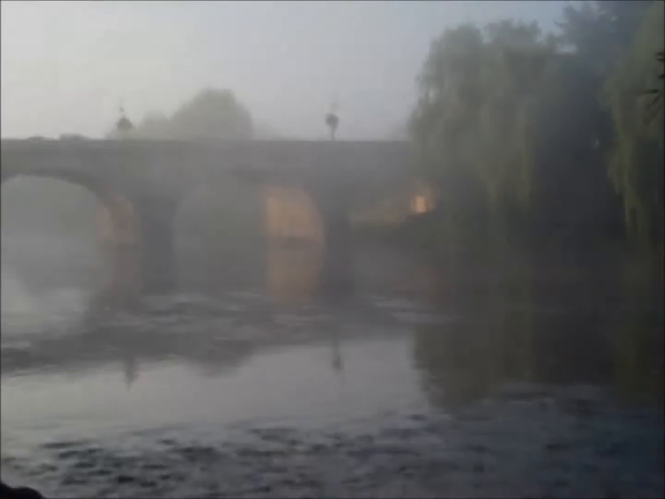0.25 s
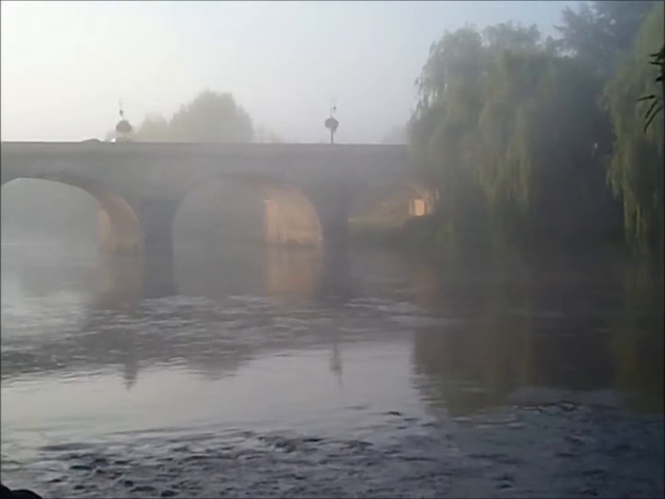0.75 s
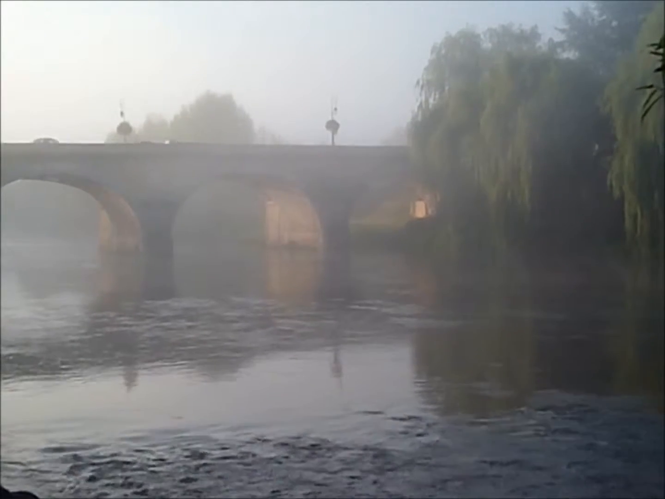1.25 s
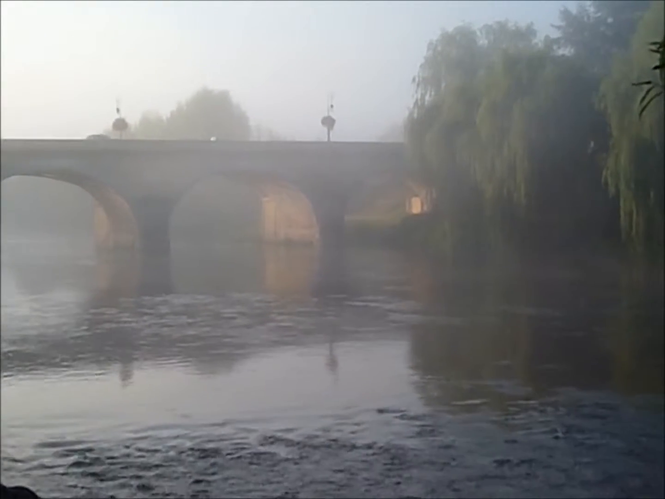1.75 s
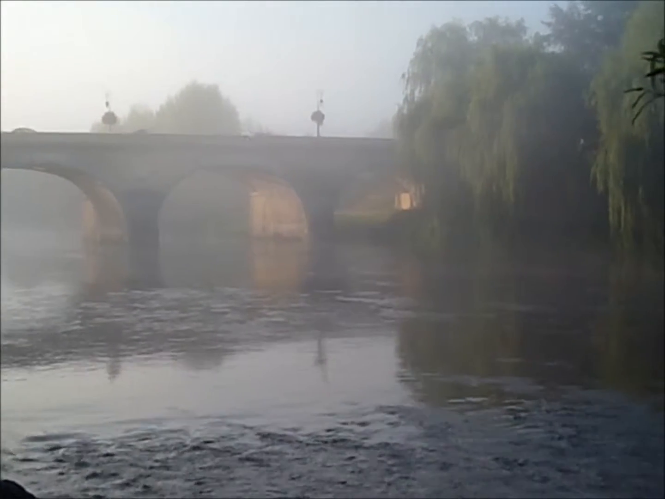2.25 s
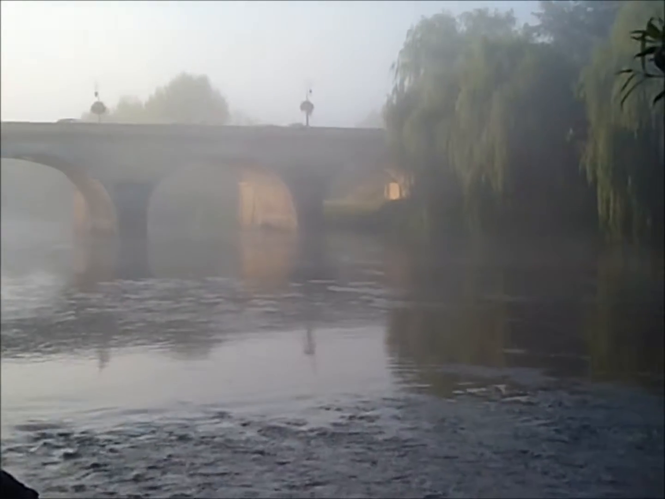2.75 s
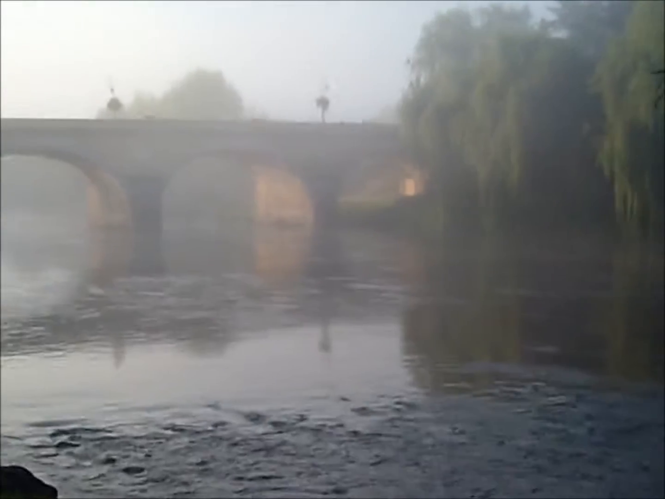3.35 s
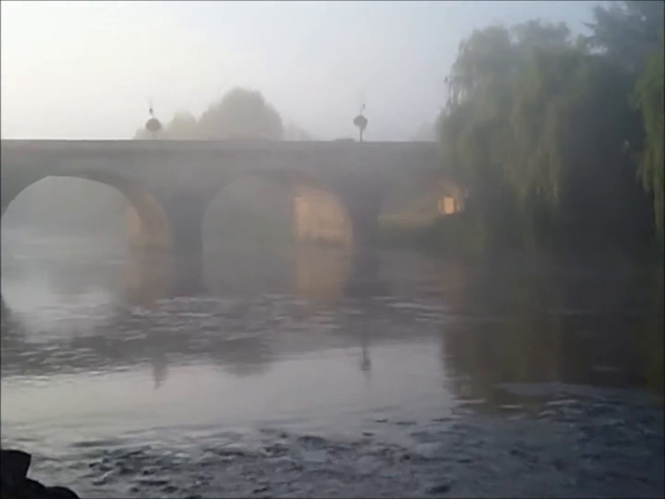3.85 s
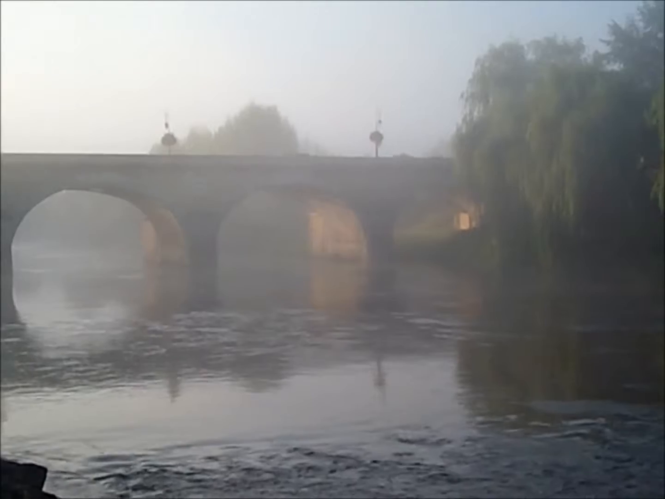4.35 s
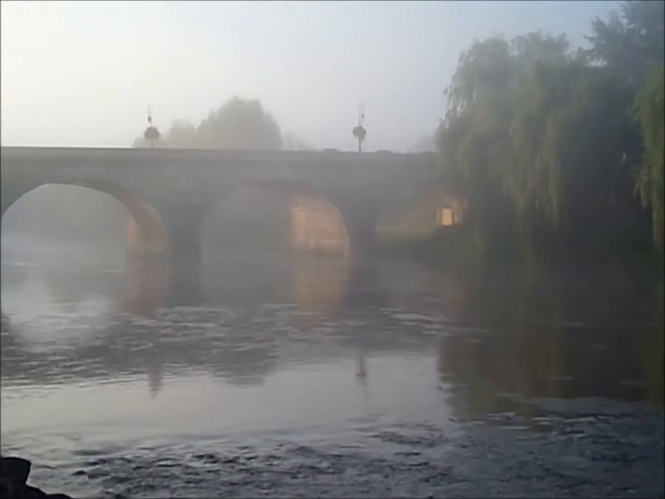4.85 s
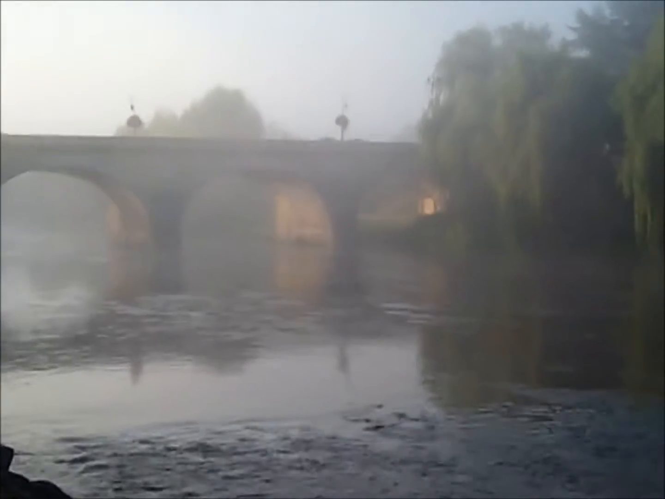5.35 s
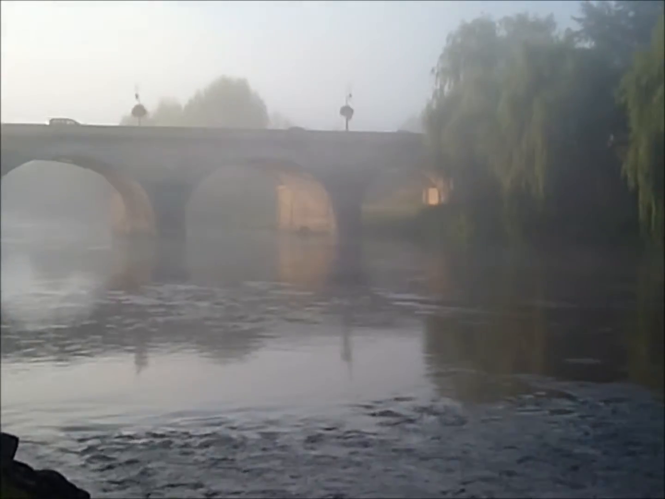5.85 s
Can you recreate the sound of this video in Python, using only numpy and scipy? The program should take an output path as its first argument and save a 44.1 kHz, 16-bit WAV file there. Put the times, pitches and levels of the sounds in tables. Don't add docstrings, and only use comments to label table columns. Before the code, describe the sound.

A soft, continuous rush of riffle water with tiny bubbling details, a slight change of tone midway, and a long fade towards quiet.

```python
import sys
import numpy as np
from scipy import signal
from scipy.io import wavfile
from scipy.ndimage import uniform_filter1d

SR = 44100
rng = np.random.default_rng(int(sys.argv[2]) if len(sys.argv) > 2 else 0)


def inscribe(sig):
    pcm = np.round(np.clip(np.atleast_2d(sig).T, -1, 1) * 32767)
    wavfile.write(sys.argv[1], SR, pcm.astype(np.int16))


def voltage_ratio(level):
    return 10 ** (np.asarray(level, float) / 20)


N = 269010

FLOW_HZ = (300, 950, 1600, 2300)


def evened(x):
    return x / np.sqrt(np.mean(x ** 2) + 1e-20)


def read(points, hz):
    f, value = np.transpose(points)
    return np.interp(np.log(hz + 1), np.log(f + 1), value)


def add(mix, s, sound):
    part = mix[:, round(s * SR):][:, :sound.shape[1]]
    part += sound[:, :part.shape[1]]


def fader_db(t):
    open_db = -48.5
    start_gain, opening_s = 0.74, 1
    fall_s, silent_s = 1.99, 7.335
    opening = start_gain + (1 - start_gain) * np.sqrt(np.clip(t / opening_s, 0, 1))
    closing = np.clip((silent_s - t) / (silent_s - fall_s), .01, 1)
    return open_db + 20 * np.log10(opening * closing)


def classes_db(t):
    facing_db = (-1.5, -1.4, -1.3)
    turned_db = (-0.55, .5, 0.17)
    # (time [s], half length [s], class 0 wash 1 roar 2 burble 3 rush, level [dB])
    swells = [(1.4, .12, 2.5, 1.5), (1.8, 0.1, 1, 2), (2.0, 0.11, 2, -1.5), (2.852, .2, 3, 1),
              (3.1, .2, 1.5, 2), (3.4, .1, 1.5, -1.2), (3.6, 0.12, 2, -2), (4.2, .1, 4, -.8),
              (4.95, .5, 3, 1.5), (4.9, 0.46, 0.5, 1.2), (4.7, .2, 1, 1), (5.599, 0.097, 1, 2),
              (5.598, 0.14, 0.5, -2.5), (5.8, .1, 3.5, 0.5)]
    turn_s, turn_length_s = 2.85, 0.44
    turned = .5 + .5 * np.tanh((t - turn_s) / turn_length_s)
    out = np.outer((*facing_db, 0), 1 - turned) + np.outer((*turned_db, 0), turned)
    for at, length, which, db in swells:
        chosen = np.arange(len(out)) == round(which)
        out = out + db * np.outer(chosen, np.exp(-((t - at) / length) ** 2))
    return out


def turbulence_db(t, hz, patchy_db=0.27, flicker_db=0.26, treble_follow=0.023):
    # (time [s], half length [s], frequency [Hz], half width [Hz], level [dB])
    splashes = [
        (1.838, 0.18, 4000, 378, 3),
        (2.9, 0.21, 4080, 280, 4),
        (5.798, 0.061, 3950, 250, -1),
        (1.045, 0.027, 1770, 250, 4),
        (4.55, .25, 1510, 200, 3.5),
        (5.4, 0.22, 1010, 150, 4),
    ]
    place = np.interp(np.log(hz + 1), np.log(FLOW_HZ), np.arange(len(FLOW_HZ)))
    weights = np.maximum(1 - abs(place[:, None] - np.arange(len(FLOW_HZ))), 0)
    rush_db = fader_db(t)
    octaves = np.clip(np.log2(hz / 3000 + 1e-9), 0, 2)
    spray_db = treble_follow * np.outer(octaves, rush_db - rush_db.mean())
    draws = rng.standard_normal((2, len(hz), len(t)))
    patches = uniform_filter1d(uniform_filter1d(draws[0], size=14, axis=0), size=12, axis=1)
    flicker = uniform_filter1d(uniform_filter1d(draws[1], size=90, axis=0), size=2, axis=1)
    field_db = weights @ classes_db(t) + spray_db
    field_db = field_db + patchy_db * evened(patches) + flicker_db * evened(flicker)
    for at, length, centre_hz, width, db in splashes:
        field_db = field_db + db * np.exp(-((hz[:, None] - centre_hz) / width) ** 2 - ((t - at) / length) ** 2)
    return field_db


def notch_filter(hz):
    # (frequency [Hz], half width [Hz])
    notches = [(4500, 223), (4900, 340), (5700, 360), (6090, 306)]
    return np.prod([abs(hz - f) / np.hypot(hz - f, w) for f, w in notches], axis=0)


def river(hiss_db=-103):
    # (frequency [Hz], level [dB per Hz])
    ahead_db = [(40, -115), (80, -107.5), (300, -95), (580, -89), (750, -83.5), (950, -80), (1250, -82.5),
                (1600, -80.5), (2100, -83), (4000, -81.5), (5250, -81.5), (6200, -93), (8000, -103),
                (10300, -126)]
    # (frequency [Hz], level [dB per Hz])
    around_db = [(30, -115), (250, -111), (500, -105), (950, -94.5), (1600, -93.5), (3000, -92.5),
                 (4000, -87.5), (5250, -85.5), (6200, -91), (7000, -98.5), (9000, -105), (10350, -113.5),
                 (10980, -111), (11120, -115), (11600, -119)]
    # (frequency [Hz], left over right [dB])
    ports_db = [(60, 0.5), (500, 1), (950, 2.5), (1600, 1), (4000, 2.5), (5300, 2), (6600, 6.5),
                (8000, 6.5), (11000, 3)]
    # (frequency [Hz], right lag [rad])
    ports_lag = [(200, 0.019), (800, 0), (4000, 0.33), (7000, .5), (8500, 0.041)]
    frames, hz = N // 256 + 5, np.fft.rfftfreq(1024, 1 / SR)
    t = np.arange(frames) * 256 / SR
    draws = rng.standard_normal((10, len(hz), frames))
    z = draws[:5] + 1j * draws[5:]
    lag = np.exp(-1j * np.outer([0, 1], read(ports_lag, hz)))
    ahead = z[0] * lag[:, :, None] * voltage_ratio(read(ahead_db, hz))[:, None]
    around = z[1:3] * voltage_ratio(read(around_db, hz))[:, None]
    balance = voltage_ratio(np.outer([.5, -.5], read(ports_db, hz)))
    water = (ahead + around) * balance[:, :, None] * notch_filter(hz)[:, None] * voltage_ratio(turbulence_db(t, hz))
    hiss = z[3:] * voltage_ratio(hiss_db - 20 * np.log2(hz / 5000 + 1e-3) ** 2)[:, None]
    sound = signal.istft(water + hiss, nperseg=1024, noverlap=768)[1]
    band = (hz > 2000) & (hz < 4300)
    rush = signal.istft(water.mean(0) * band[:, None], nperseg=1024, noverlap=768)[1]
    return sound[:, :N] / np.sqrt(np.mean(rush ** 2))


def drum(wobble_turns=0.00011):
    orders = (110, 120, 147, 148, 151, 152, 156, 157, 160, 175, 176, 180, 205, 206, 207, 211, 230, 231, 241,
              245, 246, 260, 261, 271, 296, 299, 300, 301, 355, 356)
    # (left level [dB], right level [dB], right lead [rad])
    lines = [(-34, -20, 1.5), (-30, -26, 2.5), (-41, -33, -1.6), (-42, -34, -1.6), (-47, -29, -.8),
             (-43, -30, -.6), (-41, -32, -.9), (-43, -31, -.9), (-44, -32, -1), (-38, -28, -.3),
             (-38, -26, .5), (-39, -29, 1.1), (-36, -32, 2.6), (-37, -33, 2.7), (-41, -38, 2.8),
             (-42, -37, 2), (-36, -36, -2), (-33, -35, -1.6), (-39, -38, -2.1), (-27, -31, -2.2),
             (-27, -34, -2.2), (-28, -30, -.4), (-33, -34, -.4), (-44, -39, .6), (-38, -57, .7),
             (-38, -50, .8), (-25, -38, .5), (-26, -38, .5), (-39, -45, -3.1), (-39, -46, -3)]
    turn_hz = 30000 / 1001
    wobble = wobble_turns * evened(uniform_filter1d(rng.standard_normal(N), size=9000))
    turns = turn_hz * np.arange(N) / SR + wobble
    grid = np.linspace(0, 1, 8193)
    left_db, right_db, lead = np.transpose(lines)
    angle = 2 * np.pi * (np.outer(grid, orders) + rng.random(len(lines)))
    one_turn = np.cos(angle) @ voltage_ratio(left_db), np.cos(angle + lead) @ voltage_ratio(right_db)
    return np.sqrt(2) * np.array([np.interp(turns % 1, grid, port) for port in one_turn])


def engines(second_db=-3):
    # (time [s], firing rate [Hz], level [dB])
    vehicles = [
        [(0, 72.3, -99), (.5, 75, -97), (.85, 76.5, -88), (1.05, 76, -102)],
        [(1.4, 57.2, -102), (2, 65, -95), (2.7, 76.8, -89), (3.4, 86, -94), (3.8, 81.4, -96),
         (4.15, 74.2, -101)],
        [(2.2, 49.7, -102), (2.6, 50.4, -99), (3.2, 50.8, -101), (4.2, 53, -92), (4.5, 57.8, -100),
         (4.9, 55.7, -93), (5.1, 56.3, -99), (5.3, 56.7, -94), (5.95, 57.3, -104)],
    ]
    out = np.zeros((2, N))
    for rows in vehicles:
        s, hz, db = np.transpose(rows)
        t = np.arange(s[0], s[-1], 1 / SR)
        angle = 2 * np.pi * np.cumsum(np.interp(t, s, hz)) / SR
        tone = np.sin(angle) + voltage_ratio(second_db) * np.sin(2 * angle)
        tone = tone * signal.windows.tukey(len(t), .1)
        add(out, s[0], np.sqrt(2) * voltage_ratio(np.interp(t, s, db)) * tone[None])
    return out


def bubbles(masked_db=-1.0):
    # (time [s], frequency [Hz], peak level [dB], length [ms], left over right [dB])
    rings = [(0.119, 7105, -48.4, 1.2, 10.3), (0.382, 2160, -41, 4.1, 3.4), (1.043, 1765, -37, 2.7, 0.6),
             (1.046, 818, -45.5, 6.8, 1.5), (1.055, 2080, -45.5, 4.9, 3.7), (1.915, 6922, -48, 1.3, 10.9),
             (3.266, 2880, -43.0, 4.6, 1.4), (3.55, 5383, -52, 2.7, 6.0), (4.256, 4100, -44, 3.3, 1.8),
             (5.051, 2917, -44, 2.7, 3.4), (5.211, 3929, -44, 2.3, 3), (5.399, 1800, -46.9, 3.8, 1.3)]
    out = np.zeros((2, N))
    t = np.arange(-400, 400) / SR
    for s, hz, db, ms, pan_db in rings:
        envelope = np.exp(-2.8 * (1000 * t / ms) ** 2)
        ring = envelope * np.sin(2 * np.pi * hz * (t + 8 * t ** 2))
        sides_db = np.array([[.5], [-.5]]) * pan_db
        add(out, s + t[0], voltage_ratio(db + masked_db + sides_db) * ring)
    return out


def starve(x, limit_db=-117.5, follow=.3, lower_follow=.4, jitter_db=1.9,
           from_hz=9200, split_hz=10400, lower_db=3.2):
    lead = 284
    hz, t, z = signal.stft(np.pad(x, ((0, 0), (lead, 0))), SR, "cosine", nperseg=2048, scaling="psd")
    power = (abs(z) ** 2).mean(0)
    frame_db = 10 * np.log10(uniform_filter1d(power.sum(0), size=9) + 1e-20)
    below_peak_db = frame_db - frame_db.max()
    waver = uniform_filter1d(rng.standard_normal((len(t), 2)), size=2, axis=0)
    upper, lower = jitter_db * evened(waver).T
    lower = lower + lower_db + lower_follow * below_peak_db
    waver_db = np.where((hz < split_hz)[:, None], lower, upper)
    limit = voltage_ratio(2 * (limit_db + follow * below_peak_db + waver_db))
    keep = (uniform_filter1d(power, size=11, axis=0) > limit) | (hz < from_hz)[:, None]
    return signal.istft(z * keep, SR, "cosine", nperseg=2048, scaling="psd")[1][:, lead:lead + N]


def scene():
    faded = (river() + drum()) * voltage_ratio(fader_db(np.arange(N) / SR))
    return faded + bubbles() + engines()


def low_pass(x):
    return signal.sosfilt(signal.butter(12, 11570, fs=SR, output="sos"), x)


def record(dry):
    mix = starve(dry)
    return low_pass(mix)


dry = scene()
out = record(dry)
inscribe(out)
```